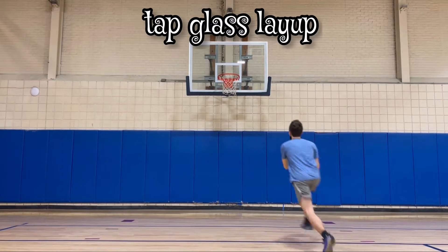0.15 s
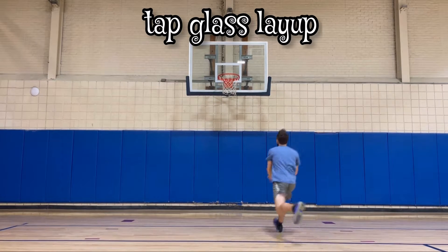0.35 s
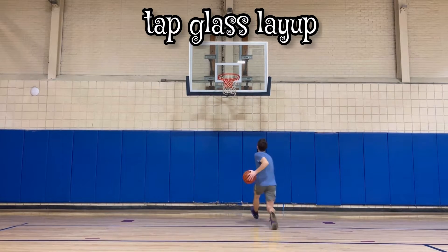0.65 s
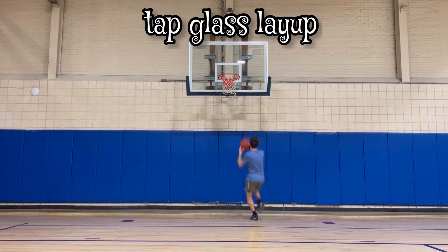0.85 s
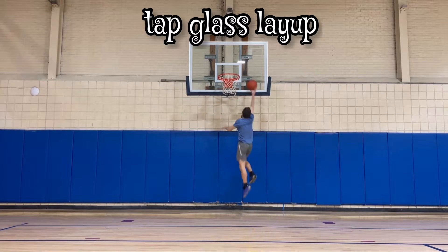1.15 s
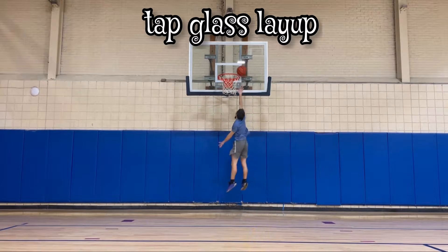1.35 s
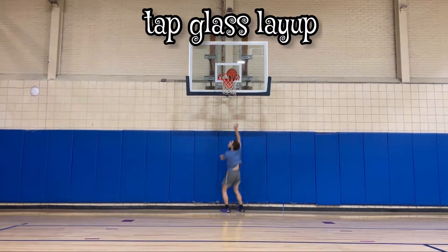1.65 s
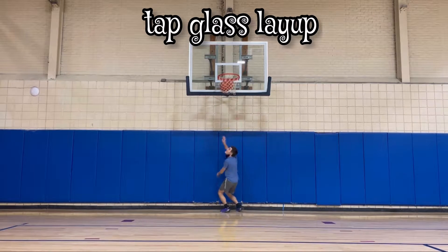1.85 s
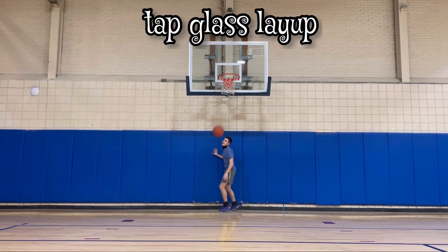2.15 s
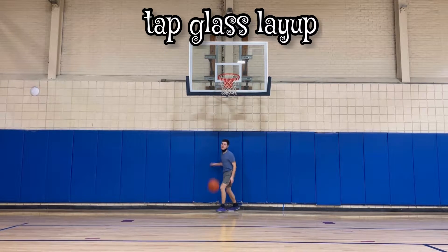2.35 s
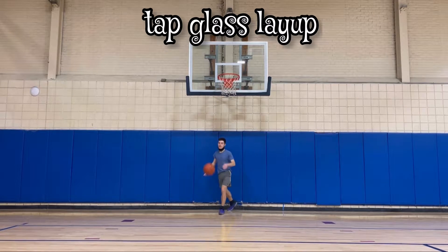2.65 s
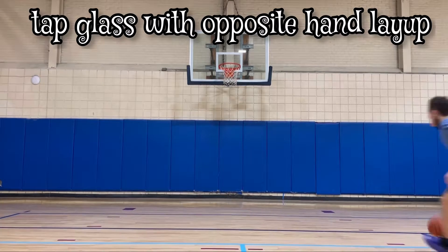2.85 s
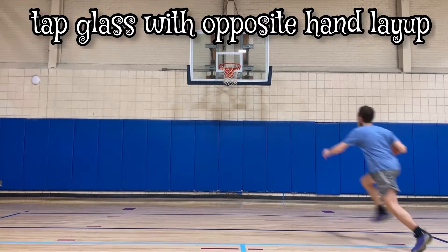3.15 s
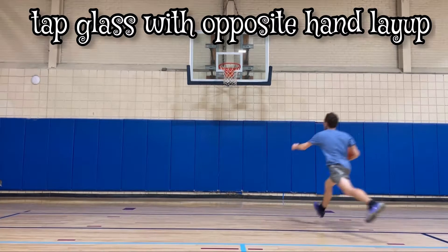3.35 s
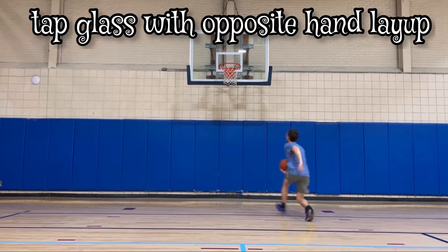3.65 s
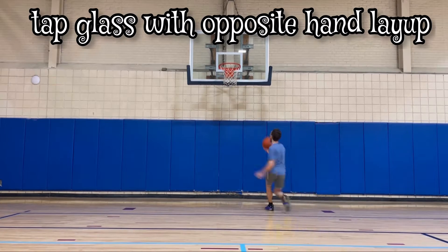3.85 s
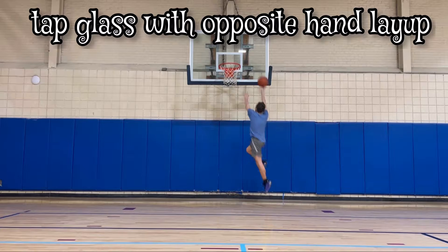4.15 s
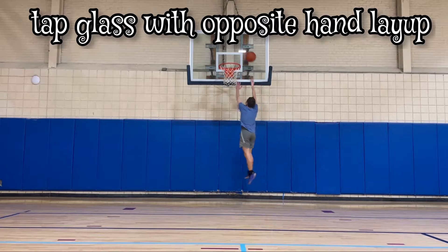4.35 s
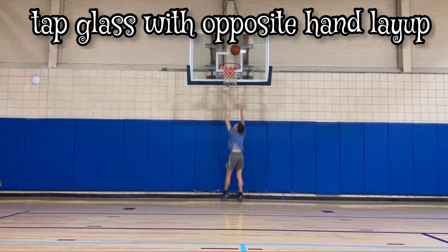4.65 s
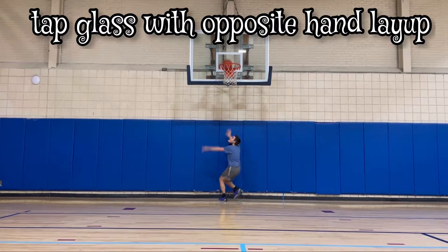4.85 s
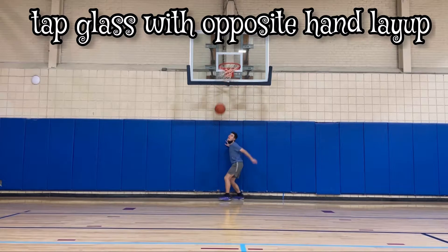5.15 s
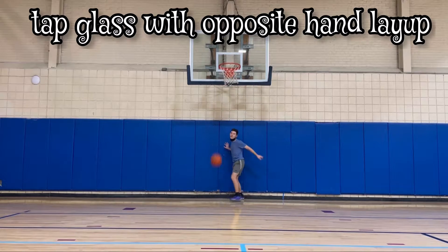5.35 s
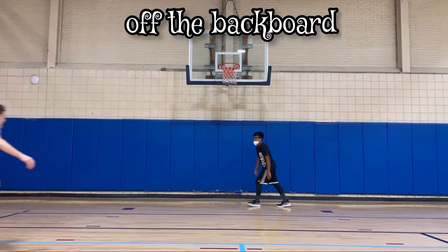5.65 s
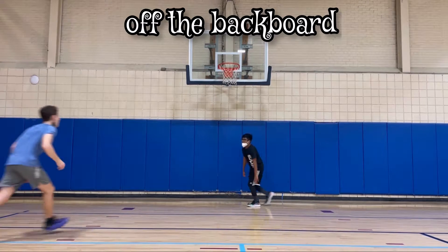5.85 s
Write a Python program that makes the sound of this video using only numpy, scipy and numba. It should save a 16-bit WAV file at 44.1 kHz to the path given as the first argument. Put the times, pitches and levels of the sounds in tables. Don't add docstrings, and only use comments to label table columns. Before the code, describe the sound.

In an empty, very reverberant gym with low fan hum, a player runs in with one dribble, quick steps, then a ball taps and rattles the backboard. He lands heavily and the ball drops with a loud ringing thud. An abrupt cut brings another dribbling run with no clear board hit, a bounce and a thin shoe squeak. A second cut brings more steps and a last bounce. Phone microphone at some distance, stereo, slightly ducked by gain control.

```python
import sys
import numpy as np
from scipy import signal
from scipy.fft import rfft, irfft
from scipy.io import wavfile
from scipy.ndimage import uniform_filter1d
from numba import njit

SR = 44100
rng = np.random.default_rng(int(sys.argv[2]) if len(sys.argv) > 2 else 0)


def store_pcm(level_fs):
    pcm = np.round(np.clip(level_fs, -1, 1) * 32767).astype(np.int16)
    wavfile.write(sys.argv[1], SR, np.atleast_2d(pcm).T)


def decibels_to_gain(level_db):
    exponent = np.asarray(level_db, float) / 20
    return 10 ** exponent


N = 264600


def unit(x):
    return x / np.abs(x).max()


def fade(x, t60):
    return x * 1000. ** (-np.arange(len(x)) / SR / t60)


def band(x, lo_hz, hi_hz):
    return signal.lfilter(*signal.butter(1, [lo_hz, min(hi_hz, 18000)], "band", fs=SR), x)


HZ = np.fft.rfftfreq(2 ** 19, 1 / SR)


def colour(x, points):
    f, db = np.transpose(points)
    level_db = np.interp(np.log(HZ + 1), np.log(f), db)
    cepstrum = irfft(np.log(decibels_to_gain(level_db)))
    cepstrum[1:2 ** 18] *= 2
    cepstrum[2 ** 18 + 1:] = 0
    shaped = irfft(rfft(x, 2 ** 19) * np.exp(rfft(cepstrum)))
    return shaped[..., :x.shape[-1]]


CUTS_S = (0, 2.747, 5.457, 6)


def add(line, s, x):
    i = int(s * SR)
    next_cut_s = min([c for c in CUTS_S if c > s], default=0)
    j = min(len(line), int(next_cut_s * SR))
    line[i:min(i + len(x), j)] += x[:max(j - i, 0)]


def ring(modes, push, scale=1):
    x = np.zeros(SR)
    for k, (f, db, t60) in enumerate(modes):
        t = np.arange(min(SR, int(2 * t60 * SR))) / SR
        tone = np.sin(2 * np.pi * scale * f * t) * 1000. ** (-t / t60)
        add(x, 0, (-1) ** k * decibels_to_gain(db) * tone)
    return unit(signal.fftconvolve(x, push)[:SR])


def thump(lo_hz, hi_hz):
    return band(band(np.arange(SR // 4) == 0, lo_hz, hi_hz), lo_hz, hi_hz)


def crack(noise, lo_hz, hi_hz, tail_db=-26, sharp=3.8, burst_s=0.01):
    x = 0.22 * fade(noise, burst_s) + decibels_to_gain(tail_db) * fade(noise, 0.54)
    x[0] = sharp
    return unit(band(x, lo_hz, hi_hz))


# ratio_to_boom_pitch, level_db, t60_s
PLANKS = [(1.1, -1, 0.34), (0.71, 2, 0.12), (2, -9, 0.32), (1.783, -7, 0.26), (2.822, 5, 0.072)]


def blow(chance, body, rattle, crack_db, knock_db, boom_db, boom_hz):
    chatter_s, chatter_gain, carry_gain = rattle
    push = chatter_gain * fade(chance, chatter_s)
    push[0] = 1
    knock = decibels_to_gain(knock_db) * ring(body, push)

    onset = 1 - fade(np.ones(SR), 4 / boom_hz)
    boom = decibels_to_gain(boom_db) * ring(PLANKS, np.hanning(int(0.0035 * SR)), boom_hz) * onset

    pulse = np.arange(SR) == 0
    floor = band(band(pulse, 0.42 * boom_hz, 1.47 * boom_hz), 0.5 * boom_hz, 1.48 * boom_hz)
    far = decibels_to_gain(crack_db + 10.0) * band(pulse, 845, 8300)
    far += decibels_to_gain(knock_db + 16) * band(pulse, 463, 1330)
    far += decibels_to_gain(boom_db + 38.5) * floor
    far += 0.4 * boom + carry_gain * knock

    add(knock, 0, decibels_to_gain(crack_db) * crack(chance, 1100, 4900))
    return knock + boom, far


def strike(table, body, rattle, hall_db):
    near, send = np.zeros(N), np.zeros(N)
    chances = rng.standard_normal((len(table), 8000))
    for (s, db, knock, boom, hz), chance in zip(table, chances):
        x, far = blow(chance, body, rattle, db, db + knock, db + boom, hz)
        add(near, s + .0007, x)
        add(send, s, decibels_to_gain(hall_db) * far)
        add(near, s + .0155, decibels_to_gain(-5.5) * band(x, 170, 1100))
    return near, send


# pitch_hz, level_db (per Hz)
FANS = [(18, -51), (36, 4), (76, -7), (334, -19.5), (1780, -22.5), (4720, -53), (9000, -66), (11700, -113),
        (19800, -120)]
# time_s, level_db
HEAVES = [
    (2.55, -49),
    (4.75, -39),
    (5.0, -40),
    (5.18, -30),
    (5.44, -30),
    (5.63, -26),
    (5.97, -38),
]


def fans():
    mid, side = colour(rng.standard_normal((2, N)), FANS)
    side = colour(side, [(hz, side_db) for hz, _, _, side_db in HALL])
    hum = np.array([mid, side]) * decibels_to_gain(-44.5) / mid.std()

    rumble_band = signal.butter(3, [28, 48], "band", fs=SR, output="sos")
    low = signal.sosfilt(rumble_band, rng.standard_normal(N))
    t, heave_s = np.arange(N) / SR, 0.06
    swell = decibels_to_gain(-60) + sum(decibels_to_gain(db) * np.exp(-((t - s) / heave_s) ** 2) for s, db in HEAVES)
    low = low / low.std() * swell
    return hum + low * decibels_to_gain(np.array([[0], [-25]]))


# pitch_hz, t60_s, level_db, side_minus_mid_db
HALL = [(60, 5.2, -22, -3.5), (130, 3.46, -20, 5), (250, 2.5, -16, 4.5), (500, 4.8, -14, 7.5),
        (1000, 4.57, -10, 5.5), (2000, 4.73, -10.5, 0.5), (4000, 3.16, -17.5, 0.5), (6170, 2.08, -22, -1.5),
        (12700, 0.86, -19, 6.5)]


def hall():
    t, out = np.arange(3 * SR) / SR, 0
    log_hz = np.log(np.fft.rfftfreq(len(t), 1 / SR) + 1)
    centres = np.log(np.array(HALL)[:, 0])
    echoes = np.repeat(np.minimum(rng.exponential(size=len(t) // 100), 2.5), 100) - 1
    noise = rfft(rng.standard_normal((2, len(t))) * decibels_to_gain(fade(4.5 * echoes, 1.5)))
    swell = np.clip((t - .016) / 0.012, 0, 1)
    for k, (hz, t60, db, side_db) in enumerate(HALL):
        octave = irfft(noise * np.interp(log_hz, centres, np.arange(len(HALL)) == k))
        decay = fade(swell, t60) + 0.75 * fade(swell, 0.44 * t60)
        out = out + decibels_to_gain(db - 17 + np.array([[0], [side_db]])) * octave * decay
    return out


BODY_LIFT_DB = 29
# age_s, knock_db, boom_db, crack_db, body_db
EARLIER = [
    (0.23, -13.5, -16.5, -12.5, -18.5),
    (0.66, -15, -42, -15.5, -20),
    (.7, -21, -27, -16, -36),
]


def earlier(line, age, knock_db, boom_db, crack_db, body_db):
    far = blow(rng.standard_normal(900), SOLE, (.01, .3, .05), crack_db, knock_db, boom_db, 86.4)[1]
    add(line, 1 - age, far)
    add(line[:SR], 1 - age, decibels_to_gain(body_db + BODY_LIFT_DB) * thump(374, 410))


# start_s, crack_db, knock_db (over crack), boom_db (over crack), boom_hz
FEET = [(0.131, -43.5, -4, 13, 77), (0.398, -28, -3, 4, 70.4), (0.4995, -36, -8, 12, 148.3),
        (0.58, -30.5, 0.5, -4, 119), (0.8151, -32, 6, -12, 75.6), (1.6733, -25, -2, -3.5, 94.4),
        (2.0016, -27.5, -12.5, -8.5, 71.6), (2.1131, -15, -23, -9, 109), (2.1551, -20, -5.5, -6, 90),
        (2.3084, -42.5, 11.5, 10.5, 107.5), (2.7714, -37.5, -2, 7, 57.5), (3.4426, -30, -4, 2, 218),
        (3.5792, -28.5, -12, -1, 183.5), (3.8115, -21, -3.5, -9.5, 84.5), (3.8841, -34, 8.5, 1, 158.8),
        (4.5777, -53, -10, 13, 70.4), (4.696, -27, 1, -6, 66.3), (4.9593, -28, -21, -2.5, 246),
        (5.06, -30.5, -0.5, 7, 109.7), (5.4811, -29, -21, -2, 75.8), (5.6162, -34.5, 7, 7, 62.2),
        (5.739, -25, -12, -5.5, 89.6), (5.9874, -20.5, -6.5, -10.5, 240)]
# pitch_hz, level_db, t60_s
SOLE = [(231, -5.5, 0.039), (311, -4.5, 0.02), (520, -4, 0.011), (812, -5.5, 0.012), (1260, -8.5, 0.0045),
        (1900, 1.5, 0.0018)]


def feet():
    return strike(FEET, SOLE, (.06, .06, .15), 0)


# start_s, level_db
SLAPS = [(0.3064, -42), (0.4456, -22), (0.4623, -41), (0.834, -26.5), (0.665, -44), (1.095, -40.5),
         (1.6592, -28), (1.694, -33), (2.5162, -37), (2.8838, -28), (3.4875, -18.5), (3.5061, -22),
         (4.2707, -39.5), (4.7017, -25), (4.745, -27.5), (5.5993, -17.5), (5.6176, -47)]


def slaps(near):
    for (s, db), chance in zip(SLAPS, rng.standard_normal((len(SLAPS), 3000))):
        add(near, s + 0.00025, decibels_to_gain(db) * crack(chance, 500, 2900, -26.5, 0.59, 0.0094))


# start_s, edge_db, slap_db
SNAPS = [(0.4244, -44, -36), (0.4424, -28, -33), (1.3686, -31.5, -32), (1.6727, -27, -27),
         (1.699, -51, -26), (2.003, -39, -28), (2.114, -42, -17), (2.4877, -26.5, -8.5), (2.8494, -16, -10),
         (2.883, -22, -24), (3.4674, -26, -24), (3.485, -27, -28), (3.8087, -54, -32), (3.884, -33.5, -40),
         (4.6952, -60, -24), (4.9397, -22.5, -16.5), (5.5697, -12, -23.5), (5.5997, -28, -28)]


def snaps(near):
    for (s, db, slap_db), chance in zip(SNAPS, rng.standard_normal((len(SNAPS), 3000))):
        edge = band(crack(chance, 7900, 20000, -42.0), 8960, 11640)
        slap = crack(chance[::-1], 1600, 5800, -43, 1.3, 0.0056)
        add(near, s + .0004, decibels_to_gain(db + 12.5) * edge)
        add(near, s + .0004, decibels_to_gain(slap_db) * slap)


# start_s, crack_db, knock_db (over crack), boom_db (over crack), boom_hz
BALL = [
    (0.425, -19, -6.5, -1, 109.8),
    (2.4862, -11, 1, -4.5, 101.7),
    (2.8495, -13.5, 3.5, -0.5, 88.9),
    (3.465, -20, 3, -1.5, 250),
    (4.9416, -17.5, 2.5, -7.5, 272.2),
    (5.568, -16.5, 1.5, -2.5, 109.7),
]
# pitch_hz, level_db, t60_s
BALL_AIR = [(1058, 5.5, 0.024), (399, -10.5, 0.15), (1305, 3, 0.0099), (1685, -2, 0.026), (2140, -6, .01),
            (3000, -18, 0.03)]


def ball():
    return strike(BALL, BALL_AIR, (.003, .3, .08), -4)


# start_s, level_db, weight_db, hardness_db
AWAY = [
    (0.426, -24, 3, -3),
    (1.368, -25, -12, -3.5),
    (2.113, -28.5, 14.5, 9),
    (2.486, -20, -3, -12),
    (2.85, -21, -2.5, -17),
    (3.466, -33, 9.5, 13),
    (3.888, -34, 3, -7.5),
    (4.697, -26, -1.5, -0.5),
    (4.944, -26, 5, 5.5),
    (5.569, -23, -5, -6),
]


def away():
    line, struck = np.zeros(N), np.array(BALL + FEET + HOOP)[:, 0]
    for s, db, weight_db, hard_db in AWAY:
        x = decibels_to_gain(42 + weight_db) * thump(66, 140.5)
        x += decibels_to_gain(BODY_LIFT_DB) * thump(188, 511)
        x += decibels_to_gain(14 - 0.26 * hard_db) * thump(1420, 1470)
        x += decibels_to_gain(8.5 + hard_db) * thump(2200, 8000)
        nearest_s = struck[np.argmin(np.abs(struck - s))]
        add(line, nearest_s, decibels_to_gain(db) * x)
    return line


# start_s, level_db, low_hz, high_hz, t60_s
SCUFFS = [(.43, -23, 130, 700, 0.25), (1.366, -25.5, 535, 1334, 0.27), (1.672, -25, 594, 5200, 0.029),
          (2.49, -23, 171, 600, 0.37), (2.5, -25, 950, 1700, 0.6), (2.893, -20.5, 1080, 3200, 0.14),
          (3.466, -20, 597, 2500, 0.023), (3.5, -36, 2000, 7600, 0.62), (3.886, -24.5, 500, 3430, 0.042),
          (4.6955, -18.5, 500, 7800, 0.011), (4.95, -27, 113.7, 201, 0.95), (5.6, -23, 1300, 4600, 0.25)]


def scuffs(near):
    for (s, db, lo, hi, t60), chance in zip(SCUFFS, rng.standard_normal((len(SCUFFS), 20000))):
        burst = band(band(chance, lo, hi), lo, hi)
        add(near, s, decibels_to_gain(db) * unit(fade(burst, t60)))


# start_s, level_db, pitch_hz, t60_s
KNOCKS = [(0.46, -21, 2470, 0.013), (0.8137, -24, 1900, 0.013), (0.815, -26, 424, 0.018),
          (0.839, -33, 2220, 0.025), (1.384, -35, 61.7, 4.3), (1.700, -27, 300, 0.08),
          (2.019, -30, 260, 0.1), (2.16, -18, 94.3, 0.35), (2.488, -22, 1500, .03),
          (2.769, -36, 990, 0.036), (2.852, -20, 1000, .03), (3.466, -24, 1500, .012),
          (3.467, -22, 520, .02), (3.470, -17.5, 210, 0.029), (3.579, -22, 190, 0.095),
          (3.812, -34, 3727, 0.0094), (3.886, -25, 520, 0.028), (4.696, -41, 460, 0.046),
          (4.943, -23.5, 3700, 0.0084), (4.944, -23.5, 1094, .02), (4.946, -23, 280.5, 0.16),
          (5.481, -32, 4000, 0.015), (5.568, -21.5, 3000, 0.0074), (5.576, -24.5, 74, 0.23)]


def knocks(near):
    for s, db, hz, t60 in KNOCKS:
        modes = [(hz, 0, t60), (1.27 * hz, -10, 0.85 * t60)]
        add(near, s, decibels_to_gain(db) * ring(modes, np.ones(4)))


# start_s, crack_db, knock_db (over crack), boom_db (over crack), boom_hz
HOOP = [
    (1.3188, -24.5, -9.5, -18, 66.4),
    (1.3676, -28.5, 4.5, -14.5, 68.5),
]
# pitch_hz, level_db, t60_s
BOARD = [(66.7, -11, 1.15), (262, -5, 0.086), (371, -5.5, 0.074), (442, 11, 0.03), (634, 5.5, 0.032),
         (711, 12, 0.039), (830, -4, 0.11), (880, -2.5, 0.099), (1028, 13, 0.0097), (1198, -4, 0.078),
         (1350, -7.5, 0.036), (1517, -0.5, 0.041), (1900, -12, 0.099)]


def hoop():
    return strike(HOOP, BOARD, (.5, .08, .4), -5)


SQUEAK_S, SQUEAK_DB = 5.135, -40.5
GRIP_S, SWELL_S, SWELL_DB, RELEASE_DB_PER_S = 0.02, 0.071, 3.5, 250
# pitch_hz, width_hz, level_db
SQUEAK_TONES = [(2543, 35, -15), (2700, 50, -17), (3068, 40, -14), (3000, 2700, -8), (4032, 45, -15),
                (5280, 20, 0), (5730, 120, -11), (5980, 60, -9.5), (6760, 120, -14), (9760, 440, -9),
                (11600, 560, -17.5), (15300, 130, -19)]


def squeak():
    n = SR // 2
    t = np.arange(n) / SR
    drag_db = SWELL_DB * np.clip(t / SWELL_S, 0, 1)
    drag_db -= RELEASE_DB_PER_S * np.maximum(t - SWELL_S, 0)
    waver = uniform_filter1d(rng.standard_normal(n), 1500)
    warped = t + np.cumsum(.004 * waver / waver.std()) / SR
    out = 0
    for hz, width, tone_db in SQUEAK_TONES:
        drift = uniform_filter1d(rng.standard_normal((2, n)), int(SR / (2.9 * width)))
        wander = (drift[0] + 1j * drift[1]) / drift.std()
        out = out + decibels_to_gain(tone_db) * np.real(wander * np.exp(2j * np.pi * hz * warped))
    return out * decibels_to_gain(SQUEAK_DB + drag_db) * np.clip(t / GRIP_S, 0, 1)


def scene():
    near = np.zeros(N)
    add(near, SQUEAK_S, squeak())
    send = 0.77 * near + away()
    for direct, far in (feet(), ball(), hoop()):
        near += direct
        send += far
    for layer in (slaps, snaps, scuffs, knocks):
        layer(near)

    side = decibels_to_gain(-17.5) * near + 1.1 * np.diff(near, prepend=0)
    out = fans() + np.array([near, side])

    room, lead = hall(), SR
    fade_in_s, fade_out_s = 0.036, .003
    for before, s, end in zip(EARLIER, CUTS_S, CUTS_S[1:]):
        i, j = int(s * SR), int(end * SR)
        line = np.r_[np.zeros(lead), send[i:j]]
        earlier(line, *before)
        out[:, i:j] += signal.fftconvolve(line[None], room, axes=1)[:, lead:lead + j - i]
        t = np.arange(j - i) / SR
        out[:, i:j] *= np.clip(0.72 + t / fade_in_s, 0, 1) * np.clip(t[::-1] / fade_out_s, 0, 1)
    return out


@njit
def follow(x, attack, release):
    e, out = .03, np.empty(len(x))
    for i in range(len(x)):
        e += (x[i] - e) * (attack if x[i] > e else release)
        out[i] = e
    return out


def top_cut(x):
    return signal.sosfilt(signal.butter(12, 16650, fs=SR, output="sos"), x)


# pitch_hz, level_db
PORT_MID = [(20, -10), (40, -10.5), (60, 6.5), (6500, -5), (7600, -10), (8700, -21.5), (10200, -14.5),
            (13000, -3.5), (14300, -8), (16500, -27)]
# pitch_hz, level_db
PORT_SIDE = [(100, -12.5), (1000, -4.5), (6000, -6.5), (8500, -3.5), (11000, -13.5), (16500, -39.5)]


def record(dry):
    mid, side = colour(dry[0], PORT_MID), colour(dry[1], PORT_SIDE)
    attack_s, release_s = 0.015, .15
    level = follow(np.abs(mid), 1 / (attack_s * SR), 1 / (release_s * SR))
    gain = (1 + level / 0.45) ** -.35 * decibels_to_gain(3.5)
    left, right = decibels_to_gain(.4) * (mid + side), decibels_to_gain(-.4) * (mid - side)
    return top_cut(gain * np.array([left, right]))


dry = scene()
out = record(dry)
store_pcm(out)
```